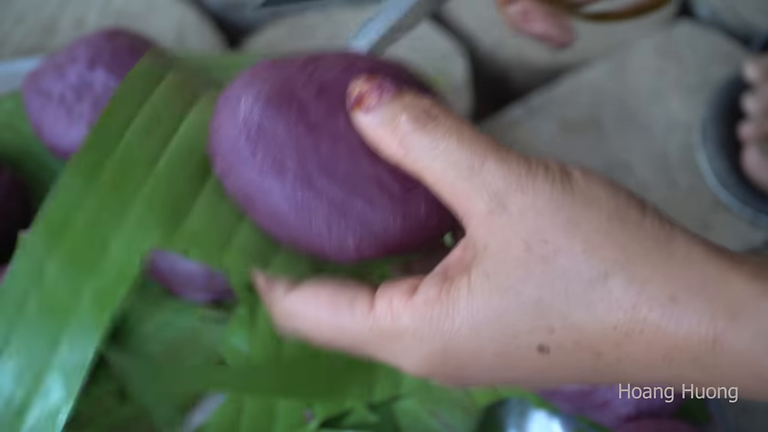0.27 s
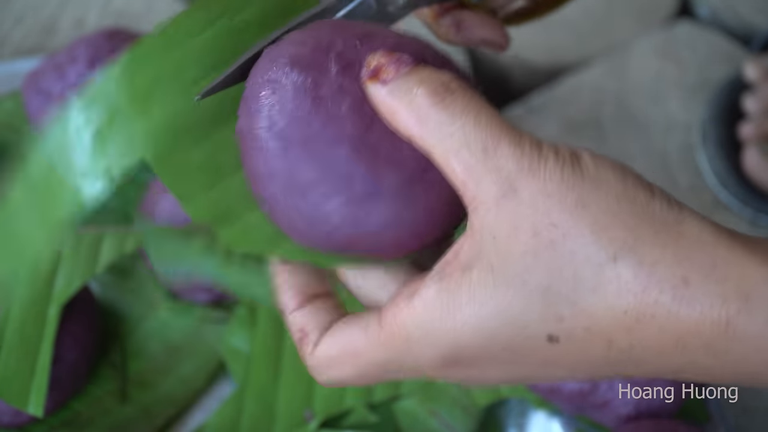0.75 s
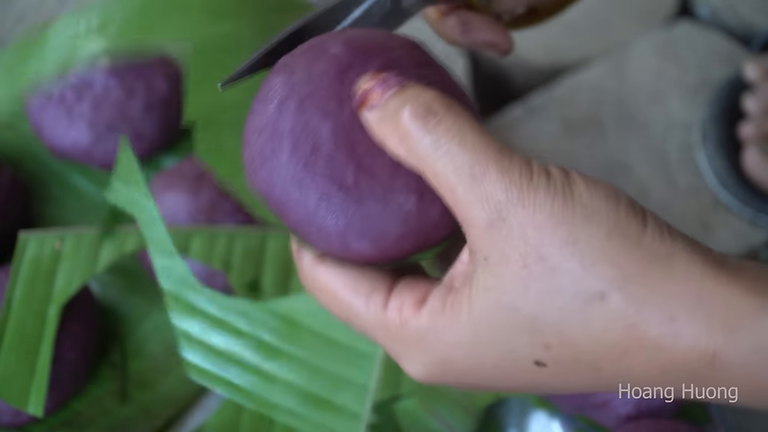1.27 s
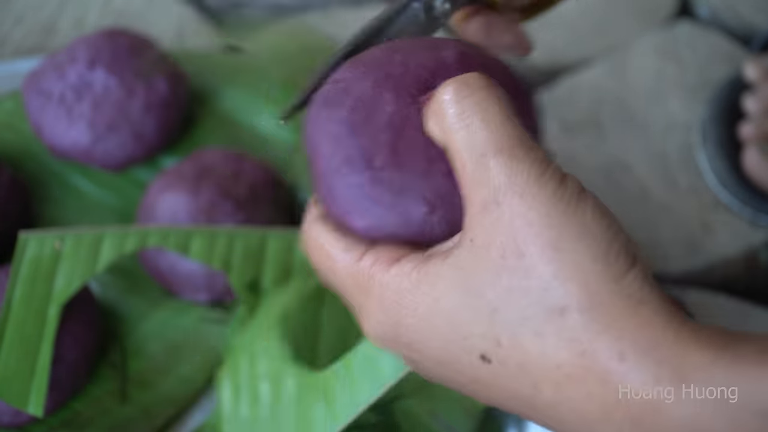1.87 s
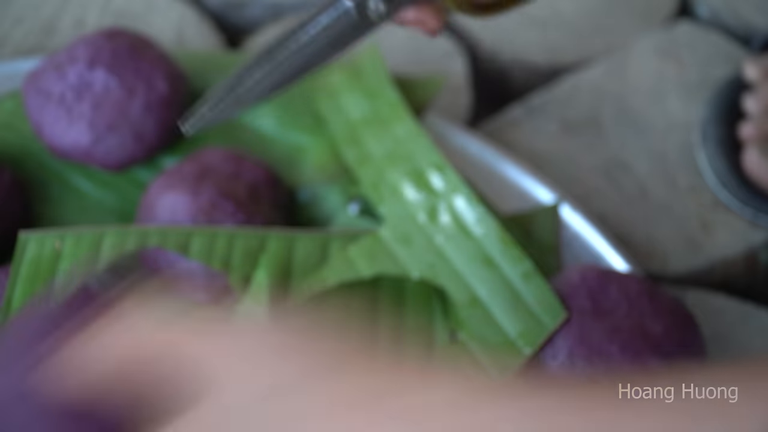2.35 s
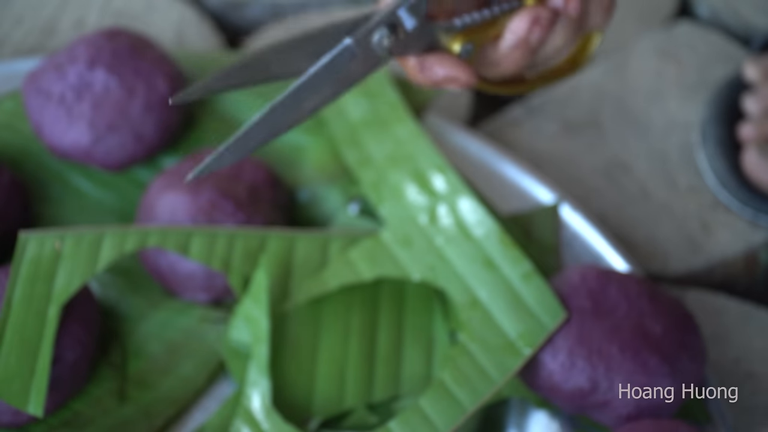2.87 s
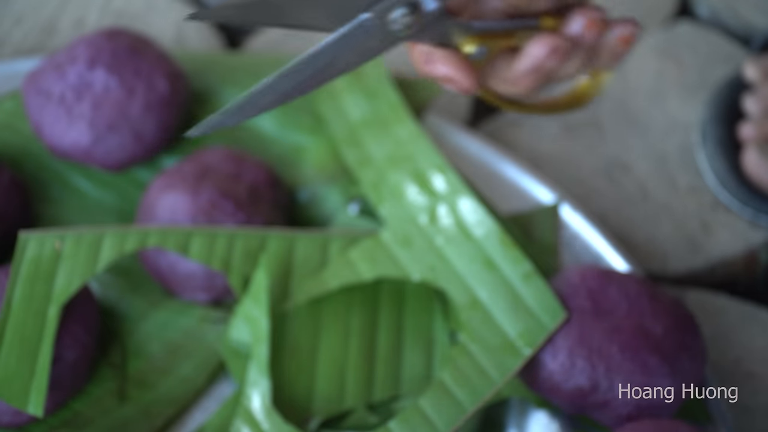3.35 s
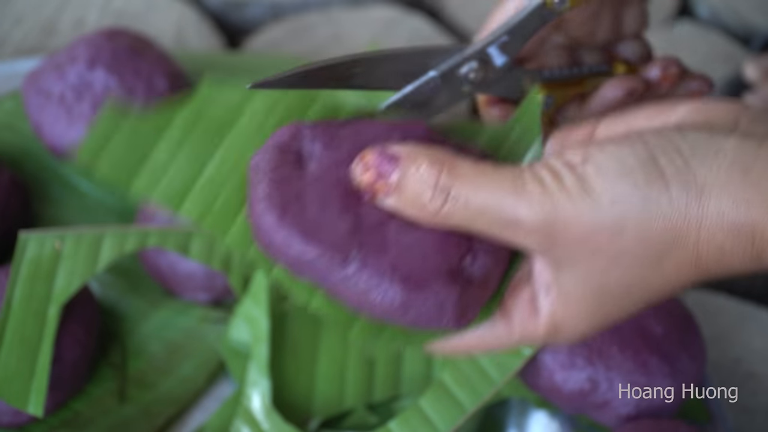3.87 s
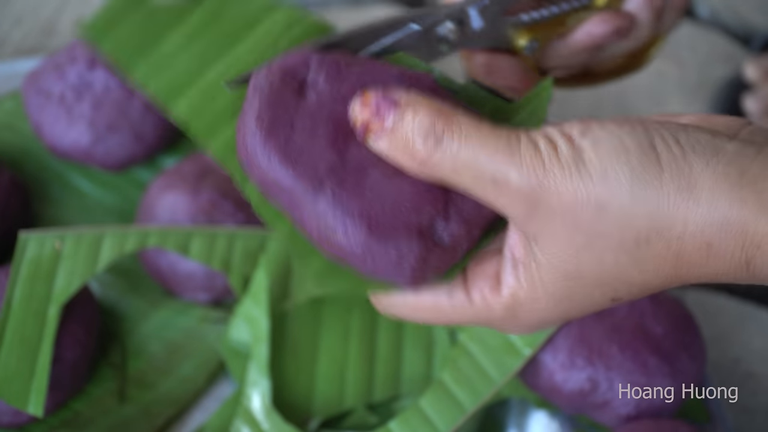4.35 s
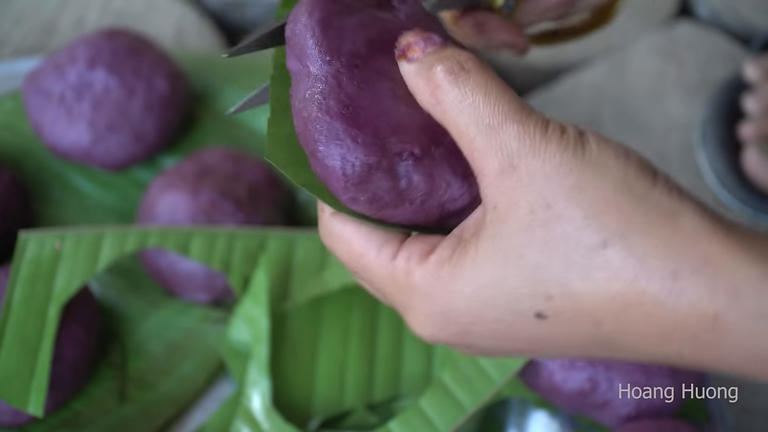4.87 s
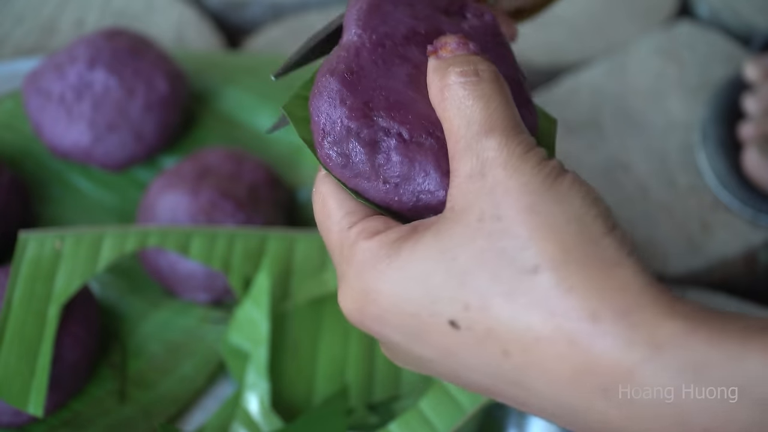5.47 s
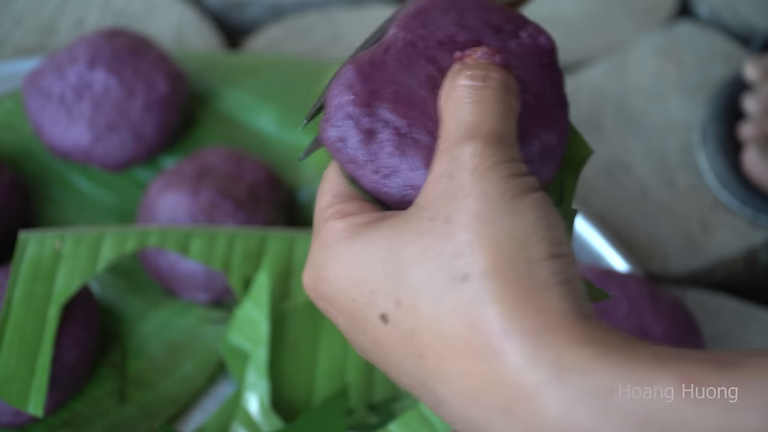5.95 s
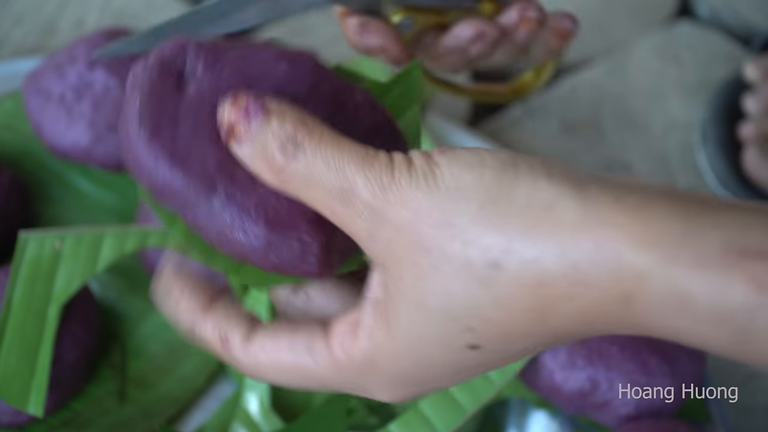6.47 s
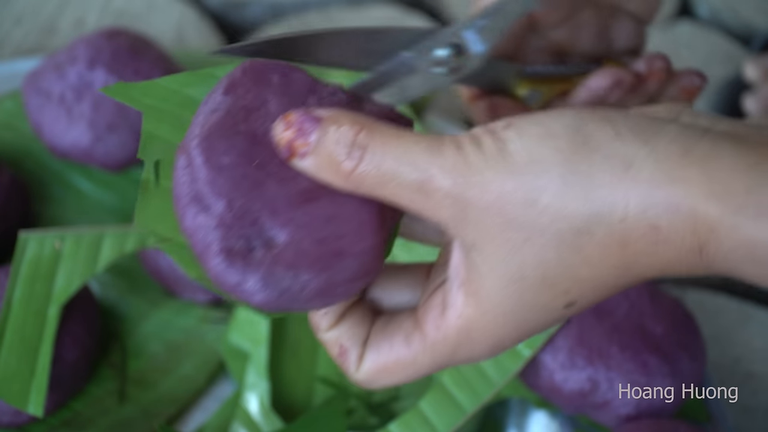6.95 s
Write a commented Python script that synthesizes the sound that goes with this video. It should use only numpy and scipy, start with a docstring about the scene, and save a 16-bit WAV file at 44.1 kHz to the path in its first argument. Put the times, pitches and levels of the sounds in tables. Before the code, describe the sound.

Scissors snip crisply through ribbed banana leaf close by, with dry ticks and rustling, one hollow tray knock with a quick bounce, and faint crickets behind.

```python
"""Steel scissors snip ribbed banana leaf close by: vein snaps and shearing hiss ring through the blade resonances.
Short ticks and a patchy, grainy rustle of loose leaf fill the gaps between cuts.
A dumpling drops on a hollow tray, bounces (decaying modes plus crushed-leaf noise) and is nudged about.
Behind them far crickets trill, a low hollow tone wavers around 400 Hz and soft air hisses, all shaped noise."""
import sys
import numpy as np
from scipy import signal
from scipy.fft import rfft, irfft, next_fast_len
from scipy.io import wavfile
from scipy.ndimage import uniform_filter1d, map_coordinates

SR = 44100
rng = np.random.default_rng(int(sys.argv[2]) if len(sys.argv) > 2 else 0)


def digitize_waveform(pressure):
    """Quantize a signal to 16-bit integers and store it at the path in sys.argv[1].

    Rows of a 2-D input are taken as channels; values are limited to [-1, 1].
    """
    field = np.atleast_2d(pressure).T
    bounded = np.clip(field, -1, 1)
    quanta = np.round(bounded * 32767).astype(np.int16)
    wavfile.write(sys.argv[1], SR, quanta)


N = 317961
T = np.arange(N) / SR


def amp(db):
    """Decibels to gain."""
    return 10 ** (np.asarray(db) / 20)


def unit(x):
    """Scale to rms 1."""
    return x / np.sqrt(np.mean(x ** 2) + 1e-20)


def along(points, hz):
    """Read (frequency, value) points on a log frequency axis."""
    point_hz, values = np.transpose(points)
    return np.interp(np.log(hz + 1), np.log(point_hz + 1), values)


def curves(rows, t=T):
    """Draw one automation curve for each column after the time."""
    times, *columns = np.transpose(rows)
    return [np.interp(t, times, column) for column in columns]


def wobble(rate, size=N):
    """A smooth random curve with rate knots a second."""
    knots = rng.standard_normal(int(size * rate / SR) + 4)
    return map_coordinates(knots, [T[:size] * rate])


def filtered(x, response):
    """Shape x with a complex response of frequency."""
    n = x.shape[-1]
    padded = next_fast_len(n + 4096)
    spectrum = rfft(x, padded) * response(np.fft.rfftfreq(padded, 1 / SR))
    return irfft(spectrum, padded)[..., :n]


def band(lo_hz, hi_hz):
    """Soft-edged pass band."""
    return lambda f: 1 / (1 + (lo_hz / (f + 1)) ** 8) / (1 + (f / hi_hz) ** 8)


def closed(points):
    """Gain of a spectrum that is silent outside its ends."""
    return lambda f: amp(along(points, f)) * (f > points[0][0]) * (f < points[-1][0])


def panned(x, db):
    """Mono to stereo with a left-right level step."""
    return np.array([x * amp(db / 2), x * amp(-db / 2)])


# Stereo likeness of the noise beds: (frequency [Hz], left-right correlation [-1 to 1])
STEREO_LIKENESS = [(60, 0.94), (180, 0.55), (550, 0.9), (1650, 0.073), (4970, 0.22), (15000, 0.16)]


def rush(response, patchy_db):
    """Stereo noise of rms 1: random gain patches in time and frequency, partly alike in both channels."""
    z = signal.stft(rng.standard_normal((2, N)), nperseg=512)[2]
    field = uniform_filter1d(rng.standard_normal(z.shape[1:]), size=5, axis=0)
    field = uniform_filter1d(field, size=8, axis=1)
    pair = signal.istft(z * amp(patchy_db * unit(field)), nperseg=512)[1][:, :N]

    def mid_side(hz):
        turn = np.arccos(np.clip(along(STEREO_LIKENESS, hz), -1, 1)) / 2
        return response(hz) * [np.cos(turn), np.sin(turn)]

    mid, side = filtered(pair, mid_side)
    return unit(np.array([mid + side, mid - side]))


FRAY = 0.16  # noise of tearing fibres behind a click, over the click


def snaps(n, rate, scatter_db=4.5, jitter=.3):
    """Veins give way at an uneven rate, each a sharp click of its own size with a short frayed tail."""
    uneven_rate = rate * np.exp(jitter * wobble(60, size=n))
    passed = np.cumsum(uneven_rate / SR) + rng.random()
    hits = np.diff(np.floor(passed), prepend=0) * amp(scatter_db * rng.standard_normal(n))
    tail = amp(-60 * T[:200] / .002)  # t60 of 2 ms
    fray = np.convolve(hits, tail)[:n] * rng.standard_normal(n)
    return hits + FRAY * fray


# Resonances of the scissor blades: (frequency [Hz], width [Hz], level [dB])
BLADE_MODES = [(761.7, 210, -6.5), (1859, 340, 2), (2311, 220, 2.5), (3153, 130, 1.5), (3500, 150, 2),
               (4365, 270, 3), (4910, 410, -0.5), (6160, 1000, -2.5), (7160, 700, -0.5), (8960, 510, -4.5),
               (10100, 990, -8.5), (11540, 590, -14.5), (12900, 2800, -20.5)]


def blades(f, shift_db=np.zeros(len(BLADE_MODES))):
    """Causal sum of the blade resonances, each shifted in level by the grip of the moment."""
    total = 0
    for k, ((centre, width, db), shift) in enumerate(zip(BLADE_MODES, shift_db)):
        resonance = 1j * f * width / (centre * centre - f * f + 1j * f * width)
        total = total + (-1) ** k * amp(db + shift) * resonance
    return total


def gripped_blades(f):
    """The blades under a fresh random grip."""
    return blades(f, rng.normal(0, 2.6, len(BLADE_MODES)))


RISE_DB, FALL_DB = 11, 15  # level gained in the rise, lost in the fall
BRIGHTEN_DB, THICKEN_DB = 3, 5  # treble and body gained from start to end of a stroke
# over a stroke the vein rate grows by this log ratio and the snaps lose this part of their share
QUICKEN, BLUR = 0.59, 0.37
# Strokes of blade or hand on leaf, values in mid-stroke where they drift: (time [s], rise [s], hold [s], fall [s],
# level [dB], swell over the hold [dB], treble over middle [dB], body over middle [dB], vein rate [1/s],
# share of snaps [0-1], contact pitch [Hz], left-right step [dB], lift at the contact pitch [dB])
LEAF_STROKES = [ (0.0, 0.0019, 0.018, 0.025, -53.5, -12, -8.5, -12, 360, 0.3, 5400, 2, 3.5),
                (0.03, 0.008, 0.012, 0.012, -49.5, -2, -0.5, -12.5, 511, 0, 2750, -0.5, 15.5),
                (0.051, 0.0045, 0.056, 0.014, -59.5, 0, -21.5, -22, 200, 0.4, 2700, 0, 18),
                (0.17, 0.0034, .06, 0.011, -72.5, 4, -5.5, -4.5, 151, 0.16, 2060, 0, 8),
                (0.639, 0.023, 0.073, 0.037, -67.5, 4.5, -5, -13, 122, 0.54, 2080, 2, 6),
                (0.8, 0.012, 0.06, 0.02, -70, 1.5, -18, -9.5, 100, 0.5, 2280, 1, 0),
                (0.941, 0.021, .004, 0.034, -61, 1, -2.5, -8.5, 394, 0.1, 7886, 0.5, 7),
                (1.03, .012, .058, .02, -50.5, -5.5, -3, -10, 354, 0.75, 2290, 1, 2),
                (1.2, 0.014, 0.0024, 0.011, -67, 1.5, 3.5, -6, 440, 0.11, 6970, 0, 8),
                (1.252, 0.012, 0.084, 0.018, -74, 6, -5.5, -15, 220, 0.7, 8870, 1, 9),
                (1.391, 0.0041, 0.0089, 0.0043, -62, 2, -4, -16, 300, .3, 5000, 0, 2),
                (1.406, 0.0039, .06, .022, -51, -2, -0.5, -15.5, 410, 0.45, 2360, 0.5, 2),
                (1.586, .012, 0.055, 0.0046, -63.5, 2, -9, -19, 304, 0.02, 3070, -1, 14.5),
                (1.639, 0.017, 0.0095, 0.015, -50, 1.5, -2, -14.5, 400, 0.4, 4770, 0, 3),
                (1.72, 0.0052, .044, 0.019, -51.5, -1, 0.5, -14.5, 400, 0.5, 4630, 1, 5),
                (1.947, 0.016, 0.017, 0.0046, -58, 3, -0.5, -29, 410, 0.8, 9400, -1, 15),
                (2.042, 0.0068, .055, 0.022, -56, -1, 4.5, -23, 500, 0.06, 2810, 0, 14),
                (2.476, 0.002, 0.011, 0.012, -50.5, -3, 2.5, -23, 612, 0.1, 4973, -3, 17.5),
                (2.942, 0.0017, 0.092, 0.01, -65, -11, -4, 5.5, 299, 0, 2794, -1, -15),
                (3.013, 0.037, 0.0015, 0.052, -54, -3.5, -4.5, 0, 299, 0.2, 2600, 3, 10),
                (3.233, 0.025, 0.016, 0.012, -67, 1.5, 5.5, -4, 400, 0.43, 8590, -2, 4),
                (3.319, 0.022, 0.0018, 0.008, -70.5, -3, -16, 10.5, 370, 0.9, 3017, 1.5, 0),
                (3.367, 0.011, 0.073, 0.036, -56.5, -2, -9.5, -13.5, 397, 0.15, 2900, 1.5, 12.5),
                (3.979, 0.0031, .105, 0.019, -65.5, -8, -8.5, -15, 120, 0.8, 5166, -1, 10),
                (4.107, 0.1378, 0.0026, 0.023, -62, -1, -2, -14, 200, 0.52, 4960, 1, 6.5),
                (4.756, 0.0037, 0.078, 0.03, -80.5, -1.5, 5, -13, 300, 0.1, 9100, 0, 5),
                (4.396, 0.004, 0.079, 0.0028, -67, 2, -8, -12, 110, 0.1, 4636, -1, 10),
                (4.449, 0.0062, 0.087, 0.012, -63.5, -7.5, -6, -18, 83, 0.5, 4540, 5, 13),
                (4.544, .004, 0.042, 0.046, -62, -1.5, -3.5, -11, 107, 0.3, 3500, 1.5, 5.5),
                (5.05, .06, .04, 0.022, -64.5, -0.5, 8, -11.5, 260, 0.2, 8600, 0.5, 3.5),
                (5.165, 0.0036, 0.013, 0.0048, -67, 1, 9, -13.5, 400, .05, 8320, 4, 10),
                (5.252, .003, .004, 0.043, -68.5, 1.5, 5, -5, 320, 0.1, 7140, -1, 4),
                (5.602, 0.028, 0.0023, 0.076, -61, 2.5, 3.5, -10, 250, 0.32, 7380, 0.5, -0.5),
                (5.992, 0.054, 0.026, 0.035, -62.5, -2.5, 6, -12, 256, 0.2, 6298, -1.5, 9),
                (6.217, .006, 0.0015, 0.067, -58.5, -4, 1.5, -7, 260, 0.17, 4800, -1, 10),
                (6.285, 0.0047, 0.068, 0.0042, -69, -1, -0.5, -9, 208, 0, 4820, -2, -4),
                (6.61, 0.058, 0.0029, 0.053, -78, -4, 6, -23, 394, 0.26, 9500, 0.5, 6), ]


def strokes():
    """Each stroke sends vein snaps and the hiss of shearing through the blades."""
    out = np.zeros((2, N))
    for (start, *stages, db, swell_db, treble_db, body_db,
         rate, share, hz, pan_db, lift_db) in LEAF_STROKES:
        corners = np.cumsum([0, *np.maximum(stages, .001)])
        n = round(corners[-1] * SR)
        level_db = db + np.interp(T[:n], corners, [-RISE_DB, 0, swell_db, swell_db - FALL_DB])
        done = np.linspace(-.5, .5, n)
        treble_db = treble_db + BRIGHTEN_DB * done
        body_db = body_db + THICKEN_DB * done
        share = np.clip(share * (1 - BLUR * done), 0, 1)

        hiss = rng.standard_normal(n) * amp(1.49 * wobble(54, size=n) + 2.9 * wobble(150, size=n))
        veins = snaps(n, rate * np.exp(QUICKEN * done))
        shear = np.sqrt(share) * unit(veins) + np.sqrt(1 - share) * unit(hiss)

        def colour(f):
            contact = amp(lift_db * np.exp(-(np.log((f + 1) / hz) / 0.075) ** 2))
            straight = 0.35 / (1 + 1j * f / 8000) ** 2  # heard straight from the leaf
            return contact * (gripped_blades(f) + straight)

        # the contact point slides along the blades: one mix of modes drifts into another
        first = filtered(shear, colour)
        last = filtered(shear, colour)
        travel = np.linspace(0, np.pi / 2, n)
        rung = np.cos(travel) ** 2 * first + np.sin(travel) ** 2 * last

        middle = unit(filtered(rung, band(1740, 5570)))
        treble = unit(filtered(rung, band(5497, 29000)))
        fizz = unit(filtered(rung, band(11604, 32000)))
        body = unit(filtered(rung, band(410, 1500)))
        treble = treble + amp(0.54 * treble_db - 13) * fizz  # a brighter cut gains most at the very top
        cut = middle + amp(treble_db) * treble + amp(body_db) * body
        edge = np.clip(np.minimum(T[:n] / 0.0085, T[:n][::-1] / 0.0084), 0, 1)
        out[:, round(start * SR):][:, :n] += panned(edge * amp(level_db) * cut, pan_db)
    return out


TICK_T60_S = 0.006
TICK_WIDTH = 0.83  # width of a tick's colour over its pitch
# Single ticks: (time [s], peak level before panning [dB], colour [Hz], treble over body [dB], left-right step [dB])
LEAF_TICKS = [(0.012, -53, 3380, -11.5, 5), (0.087, -40.5, 1880, -9, 2), (0.205, -50, 2286, -12, -3),
              (0.2216, -47.5, 1520, -14, 0), (0.293, -48, 2260, -8.5, -2), (0.056, -43, 2750, -14, -2),
              (0.081, -47, 2420, -20, 0), (0.109, -48, 1850, -20, -1), (1.033, -51, 3550, -17.5, 0),
              (1.8882, -48.5, 3500, -0.5, 1.5), (4.176, -55, 4457, -6, 0), (4.202, -47.5, 3465, -12.5, -1),
              (4.4671, -52, 4430, -13, 12.5), (4.481, -47.5, 3530, -13, -2), (6.2179, -46, 3500, 2, 0.5),
              (0.7138, -48, 3150, 1, 0), (1.41, -39, 3970, 0, 3.5), (1.6026, -48, 3300, -6, 0.5),
              (1.645, -44.5, 3500, -2, -2), (1.66, -34, 5040, 1, 5.5), (1.663, -35, 5000, 7.5, -5),
              (1.6665, -39, 5000, 3.5, 3), (1.739, -36.5, 4500, -2.5, -2.5),
              (1.5738, -43.5, 2510, -3.5, -2), (1.731, -32.5, 4520, 8, 5), (1.7484, -34, 4376, -19, -3),
              (1.9048, -48.5, 2100, -11.5, -2), (1.9784, -53, 8680, 0, 8), (2.1092, -41, 697.7, 3, 0),
              (2.1392, -36.5, 2800, -7.5, -1), (2.2158, -46, 1540, -14, 0), (2.2424, -35.5, 2410, -6.5, -1),
              (2.2465, -43, 3600, -19, 2), (2.852, -39.5, 1650, -24, 4), (2.8658, -43, 2380, -27, 0),
              (2.9012, -40.5, 2250, -16, 10), (2.912, -37.5, 2450, -10.5, -2),
              (3.1776, -51.5, 5100, -2, -6), (3.4296, -29, 3320, 2.5, 1.5), (3.432, -35.5, 4080, -2.5, 3),
              (3.794, -53.5, 4400, -5, -1), (4.0195, -54, 4140, -2, 0.5), (4.062, -52, 3950, -10, 3.5),
              (4.225, -43.5, 5080, -8, 1), (4.2451, -49, 4860, -9, -1.5), (4.256, -42.5, 4660, -1, 2.5),
              (4.4545, -42, 3570, -5, -2), (4.496, -45.5, 4530, -8, 0), (4.547, -50, 3900, -13, 3),
              (4.5856, -53, 3433, -14, -5), (5.0417, -53, 7500, 8, 0), (5.0543, -57, 6480, 2, 1),
              (5.3694, -50, 5670, -6, -2), (5.456, -46, 1970, -3, 1.5), (5.4604, -47, 2100, -3, 0),
              (5.7782, -52, 4242, 14, -4.5), (6.0698, -46, 6250, 0.5, 0), (6.2448, -46, 4380, -15, -1),
              (6.3416, -41.5, 2245, 1, 0)]


def ticks():
    """A leaf edge lets go or the blades meet: a short burst around its own colour, with its own sparkle."""
    out, t = np.zeros((2, N)), T[:2500]
    for start, db, hz, treble_db, pan_db in LEAF_TICKS:
        burst = (t == 0) + FRAY * rng.standard_normal(len(t)) * amp(-60 * t / TICK_T60_S)
        rung = filtered(burst, lambda f: gripped_blades(f) + 1.34 / (1 + 1j * f / 5000) ** 2)

        def colour(f):
            width = 1j * f * TICK_WIDTH * hz
            return width / (hz * hz - f * f + width)

        def top(f):
            return (1j * f / (5000 + 1j * f)) ** 4 / (1 + 1j * f / 12500) ** 2

        body = unit(filtered(rung, lambda f: colour(f) ** 2))
        sparkle = unit(filtered(rung, top))
        tick = body + amp(treble_db) * sparkle
        out[:, round(start * SR):][:, :len(t)] += panned(amp(db) * tick / np.abs(tick).max(), pan_db)
    return out


# Blows of the dumpling, before the fixed trims of the mix: (time [s], level [dB], crack over level [dB])
TRAY_BLOWS = [(2.6393, -25.5, -16), (2.6474, -23.5, -22), (2.6488, -10.5, -32), (2.6529, -19, -21),
              (2.686, -16, -15), (2.6899, -15.5, -28), (2.6955, -6.5, -24.5), (2.713, -22, -17),
              (2.737, -22.5, -24.5), (2.757, -23, -19.5), (2.8745, -30.5, -17.5)]
# Modes of the hollow tray, before the shared damping: (frequency [Hz], level [dB], t60 [s])
TRAY_MODES = [(61.3, 6, 0.22), (100.11, -8, 0.15), (129.8, -8.5, 0.24), (195, -7, 0.055), (289.2, -5, 0.14),
              (323, 0, 0.16), (351, -6, 0.13), (392.2, -8, 0.15), (432, 1, 0.16), (475.3, -4.5, 0.16),
              (540.4, -4.5, 0.14), (619.6, -13.5, 0.18), (719.2, -11.5, 0.13), (845.5, -15, 0.12),
              (958, -14.5, 0.1), (1057, -12, 0.067), (1219, -19, .1), (1344, -15, 0.04), (1584, -20, 0.049),
              (1764.7, -19.5, 0.078), (2333, -24.5, 0.044)]


def tray():
    """Each blow rings the tray at new strengths, with a crack and a rattle of leaf crushed underneath."""
    out, t = np.zeros(N), T[:SR // 2]
    for start, db, crack_db in TRAY_BLOWS:
        grip_db = rng.normal(0, 1.5, len(TRAY_MODES))
        ring = np.zeros(len(t))
        for (hz, level, t60), shift in zip(TRAY_MODES, grip_db):
            ring += amp(level + shift - 60 * t / t60) * np.sin(2 * np.pi * hz * t)
        ring *= amp(-60 * t / 0.035) + 0.28  # first swing damped at once
        ring *= 1 - np.exp(-t / 0.00094)  # soft contact

        crack_and_rattle = amp(-60 * t / 0.04) + 0.2463 * amp(-60 * t / 0.2)
        crush = rng.standard_normal(len(t)) * crack_and_rattle
        crush = filtered(crush, lambda f: 1j * f / (700 + 1j * f) / (1 + 1j * f / 2400) / (1 + 1j * f / 8000) ** 2)
        out[round(start * SR):][:len(t)] -= amp(db - 6) * ring + amp(db + crack_db + 7) * crush
    radiated = filtered(out, lambda f: 0.016 + (1j * f / (300 + 1j * f)) ** 2)  # a small tray moves little bass
    return panned(radiated, 0.77)


# The dumpling is pushed about: (time [s], length [s], level before the swell [dB], colour [Hz])
DUMPLING_NUDGES = [(2.785, 0.056, -48.5, 330), (2.983, 0.07, -55, 392.9), (3.018, 0.063, -54, 440),
                   (3.076, 0.13, -62.5, 409), (3.231, 0.075, -63, 480), (3.293, 0.076, -56.5, 495),
                   (3.372, 0.12, -66, 406.6), (4.45, 0.15, -65.5, 763)]


def nudges():
    """A soft, lumpy push without a strike: it swells quickly, wavers and fades around its own colour."""
    out = np.zeros(N)
    for start, length, db, hz in DUMPLING_NUDGES:
        n = round(length * SR)
        rub = rng.standard_normal(n) * amp(2.7 * wobble(72, size=n))
        rub = unit(filtered(rub, lambda f: band(150, 1500)(f) / (1 + (np.log((f + 1) / hz) / 0.24) ** 2)))
        swell = np.sin(np.pi * np.linspace(0, 1, n) ** 0.54)
        out[round(start * SR):][:n] += amp(db) * rub * swell
    return panned(out, 0.84)


# Loose leaf: (time [s], treble level [dB], middle level [dB])
LEAF_RUSTLE = [(0.0, -65.5, -63), (0.44, -84.5, -76), (0.68, -86.5, -88), (0.84, -75, -69.5),
               (1.55, -73.5, -75), (2.07, -70, -67), (2.39, -77.5, -74.5), (2.69, -75.5, -75),
               (2.83, -74, -64), (3.22, -71, -67.5), (3.3, -65.5, -62), (3.36, -70, -64),
               (3.84, -80.5, -78), (4.4, -77.5, -75.5), (5.04, -84.5, -82), (5.26, -73.5, -74.5),
               (5.44, -81.5, -76.5), (6.28, -77.5, -75.5), (6.43, -82.5, -82), (7.21, -87.5, -82.5)]


def rustle():
    """Loose leaf shifts all the time: patchy, grainy noise in the colour of the cuts."""
    treble_db, middle_db = curves(LEAF_RUSTLE)
    crackle = np.abs(unit(snaps(N, 45, scatter_db=4, jitter=1.6)))
    grain = amp(1.9 * wobble(32) + 1.2 * wobble(180)) + 0.25 * uniform_filter1d(crackle, size=30)
    middle_noise = rush(lambda f: np.abs(blades(f)) ** 0.26 * band(900, 5500)(f), patchy_db=2.5)
    treble_noise = rush(lambda f: np.abs(blades(f)) ** 0.21 * band(5500, 15000)(f), patchy_db=-1.5)
    return amp(treble_db) * unit(grain * treble_noise) + amp(middle_db) * unit(grain * middle_noise)


# Decay of the room: (frequency [Hz], t60 [s])
ROOM_DECAY = [(200, 0.59), (1000, 0.3), (4000, 0.2), (12000, 0.056)]


def room(x):
    """Each frequency of the room's answer dies at its own speed."""
    hz, t, z = signal.stft(rng.standard_normal((2, SR // 3)), SR, nperseg=256)
    decay = amp(-60 * t / along(ROOM_DECAY, hz)[:, None])
    tail = signal.istft(z * decay, SR, nperseg=256)[1]
    return signal.fftconvolve(x, tail / np.linalg.norm(tail[0]), axes=1)[:, :N]


def wide(x, side_db, from_hz, moving):
    """A broad sheet reaches the two channels by different short paths: unlike treble, alike bass."""
    paths = rng.standard_normal(500) * amp(-60 * T[:500] / 0.009)
    side = signal.fftconvolve(x.mean(axis=0), paths / np.linalg.norm(paths))[:N]
    side = filtered(side, lambda f: (1j * f / (from_hz + 1j * f)) ** 2)
    side = side * moving  # a random curve here makes the stereo width waver
    return x + amp(side_db) * np.array([side, -side])


# Crickets: (time [s], chorus level [dB])
CRICKET_LEVEL = [(0, -68.5), (1.8, -73), (3.6, -67), (4.9, -74), (6.4, -68), (7.21, -70)]
# Spectrum of the chorus: (frequency [Hz], relative density [dB per Hz])
CHORUS_SHAPE = [(3400, -27.5), (3850, -8), (4150, -1), (4400, -5.5), (4850, -11), (5300, -25)]


def crickets():
    """A chorus of band-shaped noise, with one narrow-band singer pulsing about 12 times a second."""
    chorus = rush(closed(CHORUS_SHAPE), patchy_db=2.5)
    phase = 2 * np.pi * np.cumsum(12 + .6 * wobble(0.97513)) / SR
    beat = np.clip(np.sin(phase) + 0.3964, 0, 1)
    song = rush(lambda f: 1 / (1 + ((f - 4140) / 45) ** 2), patchy_db=-2)
    singer = beat * amp(1.2 * wobble(0.72)) * song
    return amp(curves(CRICKET_LEVEL)[0]) * (chorus + amp(-3) * singer)


# Hollow tone, before its random waver: (time [s], level [dB])
HOLLOW_LEVEL = [(0.0, -79), (0.12, -73), (0.26, -71.5), (0.62, -82), (0.94, -72.5), (1.4, -81.5),
                (1.85, -70.5), (2.27, -81.5), (2.55, -74), (2.85, -79.5), (3.45, -76.5), (3.69, -78),
                (4.42, -72), (5.3, -78.5), (5.6, -67.5), (5.92, -76.5), (6.34, -71.5), (7.01, -78.5),
                (7.21, -81)]
# Spectrum of the hollow tone: (frequency [Hz], relative density [dB per Hz])
HOLLOW_SPECTRUM = [(250, -36.5), (320, -13.5), (375, -14), (395, 0), (418, -12), (490, -12.5), (600, -30.5)]


def hollow_tone():
    """Noise gathered around 400 Hz, its level wavering at random."""
    level_db = curves(HOLLOW_LEVEL)[0] + 2.7 * wobble(7) + 2.5 * wobble(20)
    return amp(level_db) * rush(closed(HOLLOW_SPECTRUM), patchy_db=0.5)


# Spectrum of the air: (frequency [Hz], relative density [dB per Hz])
AIR_SHAPE = [(20, 0.5), (60, -2.5), (150, -6), (300, -6.5), (700, -8.5), (1300, -15.5), (2500, -11.5),
             (5000, -16.5), (8000, -20), (11500, -26), (12500, -34), (16000, -41)]


def air():
    """A soft, steady bed of noise that falls toward the treble."""
    return amp(-75) * rush(lambda f: amp(along(AIR_SHAPE, f)), patchy_db=1.5)


def scene():
    """Near sounds with their room, over the background."""
    cuts, clicks = strokes(), ticks()
    knock = tray() + nudges()
    boom = room(knock).mean(axis=0)  # echoes of the tray are alike in both channels
    leaf = wide(cuts + clicks, side_db=-6, from_hz=1300, moving=wobble(11))
    dumpling = wide(knock + amp(-14.5) * boom, side_db=-3.5, from_hz=1100, moving=1)
    leaf_room = room(amp(-8.5) * cuts + amp(-6.5) * clicks)
    background = crickets() + hollow_tone() + air()
    return leaf + dumpling + leaf_room + rustle() + background


TOP_HZ = 15850


def record(dry):
    """Cut everything above the band limit."""
    return filtered(dry, lambda hz: hz < TOP_HZ)


dry = scene()
out = record(dry)
digitize_waveform(out)
```